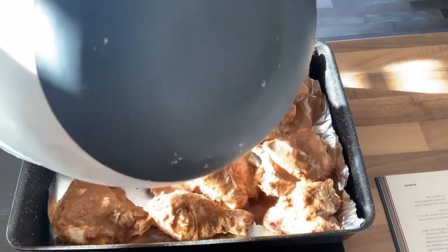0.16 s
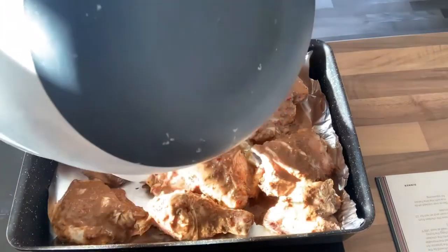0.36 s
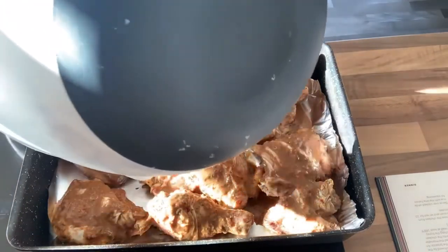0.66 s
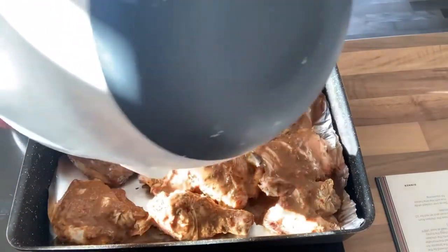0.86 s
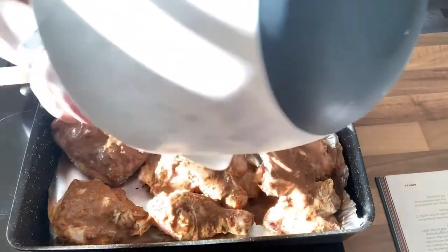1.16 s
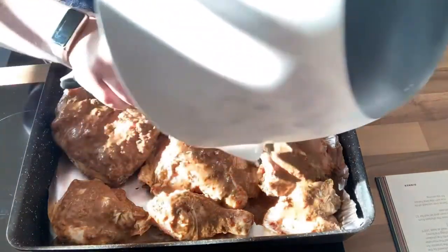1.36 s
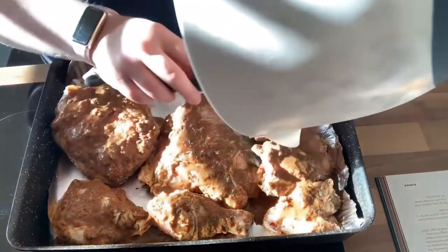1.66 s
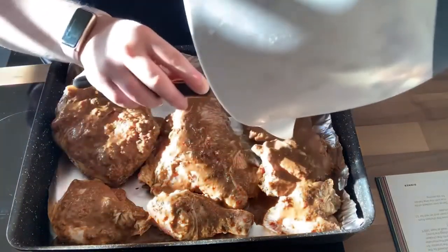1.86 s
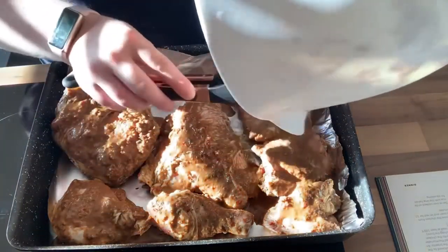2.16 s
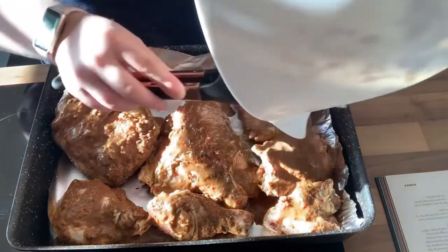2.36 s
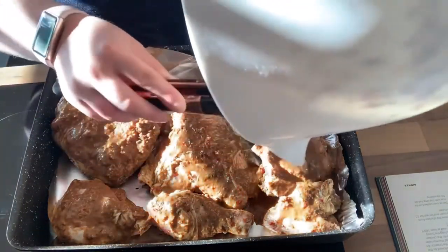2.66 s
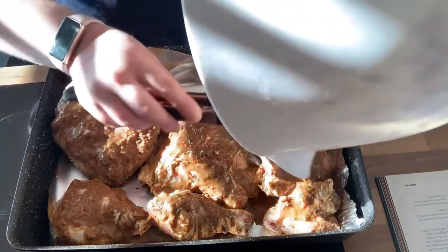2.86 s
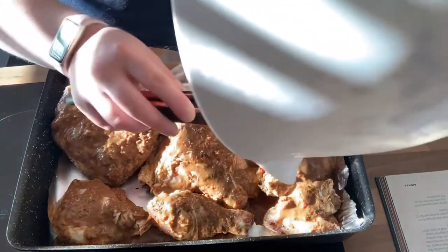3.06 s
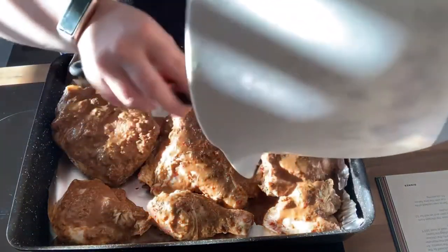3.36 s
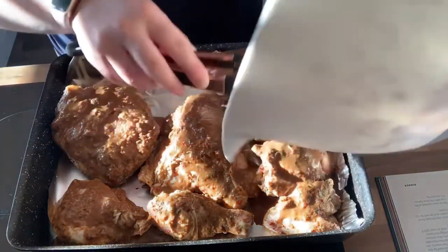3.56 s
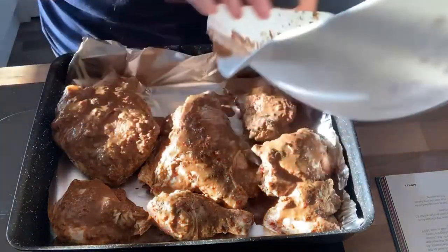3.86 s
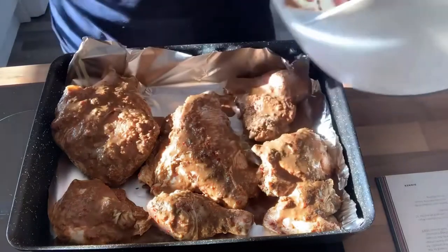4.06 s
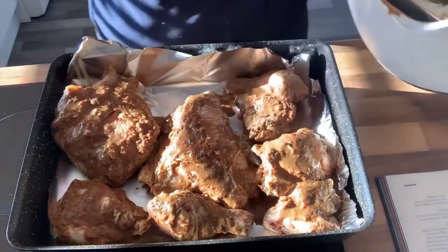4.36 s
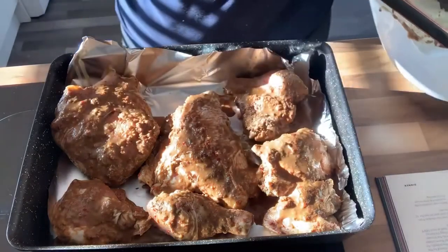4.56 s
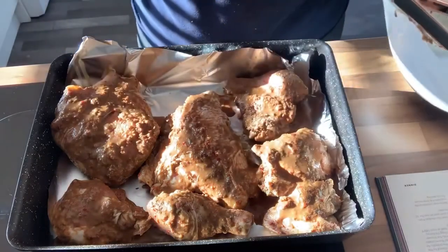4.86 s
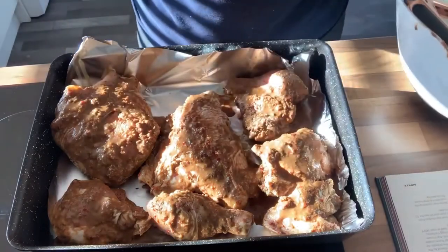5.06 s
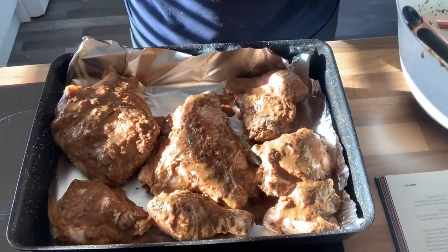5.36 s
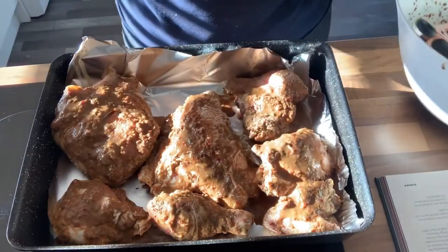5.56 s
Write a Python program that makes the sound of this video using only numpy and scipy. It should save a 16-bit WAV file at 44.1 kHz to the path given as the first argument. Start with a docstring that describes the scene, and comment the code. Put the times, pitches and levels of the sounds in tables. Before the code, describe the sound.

Metal tongs tap and scrape inside a hollow plastic bowl in a small kitchen, then the bowl is set down on wood over a low motor hum.

```python
"""From the start a fan motor hums in a small kitchen. From 0.36 s metal tongs tap and scrape inside a tilted
plastic mixing bowl above a roasting tray: short hollow rings, a rush of wall noise, steel modes, gritty hiss.
Sleeves rustle faintly from 2.67 s. At 3.93 s the rim is knocked, weakly again at 4.21 s, with diffuse tails.
At 4.65 s the bowl clicks down on the wooden worktop, whose modes ring; it rocks once. Hum and air remain."""
import sys
import numpy as np
from scipy import signal
from scipy.fft import rfft, irfft, next_fast_len
from scipy.io import wavfile
from scipy.ndimage import uniform_filter1d

SR = 44100
rng = np.random.default_rng(int(sys.argv[2]) if len(sys.argv) > 2 else 0)


def dump_mix(stems):
    """Bounce the given channels to the path in sys.argv[1] as a 16-bit WAV at rate SR."""
    frames = np.atleast_2d(stems).T  # one column per channel
    limited = np.clip(frames, -1, 1)  # hard clip at full scale
    pcm = np.round(limited * 32767).astype(np.int16)
    wavfile.write(sys.argv[1], SR, pcm)


N = 250917
TIME_S = np.arange(N) / SR

# tong taps; the last row is the click of the bowl being set down:
# t/s, level/dB, hollow f/Hz, left minus right/dB; then, relative to level:
# treble crack/dB, low knock/dB (before its offset), wall rush/dB, clang/dB, after-ring f/Hz, after-ring/dB
CONTACTS = [(0.3576, -20.5, 2270, -0.7, -37, -7, -16, -36, 2100, -34),
            (0.362, -36, 2360, -2, -11, -25, -15, -25, 2180, -29),
            (0.487, -40.5, 1960, -4, -19, -18, -5, -28, 1980, -20),
            (0.7821, -27, 2283, 1.5, -14, -2.5, -7.5, -11, 2370, -30),
            (0.7847, -27, 2235, -6, -11, 0, -8.5, -34, 1860, -30),
            (0.922, -41.5, 1800, -5, -20, -10, -10.5, -26, 1620, -19),
            (1.04, -55, 1440, -2, 10, 3, -1, 1, 1410, -22),
            (1.1349, -16, 1634, -4, -4, -10, -12.5, -7.5, 1653, -18),
            (1.1377, -22, 1680, -6.5, -8, -7, -15, -14, 1600, -24),
            (1.499, -18, 1640, -12, -17.5, -8.5, -16, -32, 1585, -20),
            (1.778, -21.5, 1656, -8.5, -29, -16, -18, -23, 1560, -26),
            (1.872, -46.5, 1890, -3, -6, 8, -3, -6, 1820, -29),
            (2.103, -17.5, 1625, -11.5, -25.5, -9.5, -22, -12, 2520, -23),
            (2.122, -26.5, 1970, -7.5, -44, -11, -28, -21, 1930, -17),
            (2.165, -44, 1590, 10, -8, -1, -9, -23, 2555, -10),
            (2.28, -27.5, 1680, -1.5, -22.5, 1.5, -13.5, -7, 1840, -13),
            (2.48, -27.5, 1580, -3.5, -15, 6, -17, -9.5, 1500, -36),
            (2.727, -34.5, 1595, -9.5, -38, -1, -19.5, -15, 1537, -29),
            (2.748, -41, 1740, -3, -35, -10.5, -13, -15, 1700, -21),
            (2.760, -42.5, 1630, -7, -19, -18, -17.5, -29, 1580, -23),
            (2.79, -43.5, 1500, -2.5, -13, -17, -13.5, -10.5, 1500, -26),
            (2.837, -40.5, 1660, -1, -15, -11, -36, -20, 1600, -24.5),
            (2.8437, -35, 1660, -2, -22.5, -4, -24, -19.5, 1706, -22),
            (3.0878, -18, 1543, -7.5, -29, -34, -10.5, -5, 1980, -15),
            (3.0925, -9.5, 1596, -9, -9.5, -12.5, -26.5, -18, 1518, -30),
            (3.3536, -25, 1746, -11.5, -4, 2.5, -14.5, -16, 1540, -18),
            (3.36, -27, 1730, -4, -39, -24.5, -8, -5, 1620, -15.5),
            (3.926, -31, 1650, -2, 9.5, 1.5, -3, -6, 1856, -8.5),
            (4.204, -41, 1780, -1.5, -4.5, -2, 4.5, -1, 1643, 2),
            (4.209, -34.5, 2450, 0, -6.5, -17, 0.5, -3.5, 1820, -12),
            (4.653, -45, 1840, -9, -15, 23, 4, -4.5, 1810, -3)]
# colour of the bowl wall: f/Hz, density/dB per Hz
WALL = [(530, -43.5), (900, -3), (1100, -15.5), (1530, -0.5), (1650, 7.5), (2510, -1), (3060, -6.5),
        (3730, -6.5), (4060, -14), (4440, -7), (4790, -21), (5160, -33.5), (5600, -15.5), (6500, -28.5),
        (8450, -70), (14300, -120)]
# colour of the hard contact's crack: f/Hz, density/dB per Hz
CRACK = [(2500, -29), (3500, -9), (5300, -7), (7000, -2), (8500, -9.5), (10500, 0), (11800, -2.5),
         (13000, -45)]
# modes of the steel arms, damped by the hand: f/Hz, level/dB, t60/s
TONGS = [(835, -10.5, 0.027), (1110, -10.5, 0.048), (1250, -7, 0.06), (1820, -11, 0.11),
         (1980, -8.5, 0.037), (2313, -4, 0.05), (2556, -10.5, 0.1), (2790, -13, 0.08), (3000, -13, 0.0088),
         (3426, -10.5, 0.029), (3737, -11, 0.022), (4400, -20, 0.023), (4830, -9.5, 0.012),
         (5880, -17, .03)]
# tongs sliding or rattling in the bowl; the rows after the knocks are diffuse tails, the last is the tongs #
# rattling as the bowl lands and rocks: # start t/s, held/s, level/dB, hiss re level/dB, hollow f/Hz
RUBS = [(0.384, 0.12, -49.5, -5, 2010), (0.817, 0.086, -54.5, -0.5, 1630), (1.169, 0.11, -54.5, -2, 1680),
        (1.53, 0.028, -47.5, -4.5, 1577), (1.81, 0.047, -53, -0.5, 1616), (2.125, 0.13, -61.5, -4.5, 2170),
        (2.5, 0.033, -70, -22, 1640), (2.75, 0.044, -51, -1, 1677), (3.115, 0.045, -45, -5.5, 1820),
        (3.95, 0.051, -49.5, -5.5, 1622), (4.225, 0.058, -55.5, -20, 1680),
        (4.665, 0.063, -56.5, -16, 1846)]
# colour of metal rubbing plastic: f/Hz, density/dB per Hz
HISS = [(2000, -14.5), (3000, -2.5), (4300, -1.5), (5100, -5.5), (6300, 1.5), (7800, -4.5), (9500, -6.5),
        (11300, 3), (11900, -30.5)]
# blows on the rim: t/s, level/dB, push/ms, pitch ratio
RIM_KNOCKS = [(3.928, -8.5, 1.5, 1.0), (4.207, -24, 1.64, 1.19)]
# low modes of the whole bowl, f before the pitch ratio: f/Hz, level/dB, t60/s, polarity
RIM = [(364, -19.5, 0.066, 1), (387.6, -15.5, 0.18, 1), (425.6, -17.5, 0.2, -1), (449, -12, 0.035, 1),
       (496, -38.5, 0.42, 1)]
# bowl meeting worktop, rocking once before it settles: t/s, level/dB, push/ms, pitch ratio
SET_DOWN = [(4.655, -6.5, 2.74, 0.98), (4.703, -26.5, 2.05, 0.86)]
# worktop modes under the bowl, f before the pitch ratio: f/Hz, level/dB, t60/s, polarity
WORKTOP = [(56, -28.5, 0.12, -1), (70.8, -21, 0.4, -1), (91, -27, 0.19, 1), (121.4, -12.5, 0.36, 1),
           (149.5, -3, 0.34, -1), (178.5, -11, 0.28, 1), (221, -26.5, 0.29, 1), (338, -30.5, 0.39, -1),
           (472, -9.5, 0.19, 1), (491.5, -11.5, 0.11, 1), (570, -12, 0.038, -1), (851, -1.5, 0.14, 1),
           (980, -15, 0.088, -1)]
# sleeves as the arms move: start t/s, held/s, level/dB
RUSTLE = [(2.671, 0.053, -64.5), (3.602, 0.086, -64), (4.54, 0.049, -66), (4.968, 0.081, -65),
          (5.47, 0.13, -68)]
# motor harmonics: multiple, level/dB, lower throb sideband/dB, upper throb sideband/dB
HUM = [(1, -60, -92, -89.5), (2, -51.5, -81, -82), (3, -44.5, -62.5, -56.5), (4, -76.5, -74, -76),
       (5, -56, -57, -92.5), (6, -70.5, -81, -82), (7, -69.5, -81, -60.5)]
# kitchen air, part shared by the channels: f/Hz, density/dB per Hz
AIR_MID = [(15, -60), (25, -22), (48, -9.5), (59, -12.5), (117, -7), (148, -8.5), (278, -14), (361, -12.5),
           (390, -10.5), (563, -35.5), (690, -30.5), (860, -37.5), (1200, -39.5), (1450, -34), (2400, -45),
           (4000, -47), (5000, -57), (6800, -45), (8000, -59.5), (13000, -85)]
# kitchen air, part opposed between the channels: f/Hz, density/dB per Hz
AIR_SIDE = [(15, -85), (25, -43), (64, -4.5), (144, -1.5), (237, -2), (270, 4.5), (534, -9.5), (658, -11),
            (1200, -22.5), (1560, -20.5), (3610, -35.5), (8550, -27), (13000, -68)]

AIR_MID_DB, AIR_SIDE_DB = -48, -54
TAP_LAG_MS, TAP_LAG_MS_PER_DB = 0.12, -0.01  # left is late; less so where left is the louder
CHATTER_MS, TAP_ROOM_DB = 3.5, -4
LOW_KNOCK_OFFSET_DB = -10.5
AFTER_RING_T60_S, AFTER_RING_WIDTH = 0.17, 0.022  # width: scatter as a share of pitch
CLATTER_DB, CLATTERS_PER_S = 4, 250  # the loose arms rattle, so the rush comes in grains
CLANG_SCATTER_DB = 2.5
SLIDE_ATTACK_S, SLIDE_SAG_DB_PER_S, SLIDE_RELEASE_DB_PER_S = 0.046, 28, 188
SLIDE_BRIGHTEN_DB_PER_S, SLIDE_CLANG_DB = 1, -6.5
WALL_PEAK_HZ = 1650  # wall colour shifts with the hollow's pitch
SCUFF_DB, SCUFFS_PER_S = 4.5, 90  # uneven pressure along a slide
GRITTY_DB, GRAINS_PER_S = 3, 500  # the hiss is gritty: its level flickers in fine grains
UNEVEN_T60_S = 0.05  # a short random ring makes the hiss's spectrum uneven
RUSTLE_ATTACK_S, RUSTLE_RELEASE_DB_PER_S = 0.04, 156
ROOM_T60_S, ROOM_TREBLE_T60_S, ROOM_DB = 0.36, 0.15, -6
HUM_HZ, THROB_HZ, THROB_RAD = 38.02, 14.33, -1.3
TOP_HZ = 12600


def contacts():
    """Each contact rings the bowl's hollow for a few cycles, then wall and arms, with chatter and crack."""
    direct, sent = np.zeros((2, N)), np.zeros(N)
    clatter = unit(undb(CLATTER_DB * walk(CLATTERS_PER_S)))
    t = np.arange(int(0.2 * SR)) / SR
    fade = np.exp(-t * 1000 / CHATTER_MS)
    rise = 1 - np.exp(-t / 0.00048)
    for s, db, hz, pan_db, crack_db, low_db, wall_db, clang_db, after_hz, after_db in CONTACTS:
        hollow = hollow_ring(t, hz, fade)
        after = after_ring(t, after_hz) * undb(after_db)
        # wall modes too many to tell apart: a dying rush, unlike in each channel
        wall = unit(coloured(WALL, (2, len(t)))) * undb(wall_db - 60 * t / 0.14)
        crack = unit(coloured(CRACK, (2, len(t)))) * undb(crack_db)
        crack = crack * (fade + 0.53 * undb(-60 * t / 0.033))
        knock = unit(band(rng.standard_normal((2, len(t))), 110, 1200))
        knock = knock * undb(low_db + LOW_KNOCK_OFFSET_DB - 60 * t / 0.13)
        steel = undb(clang_db) * clang(t)

        body = (hollow + rise * after) * undb(np.array([[pan_db], [-pan_db]]) / 2)
        grains = clatter[int(s * SR):][:len(t)]
        rush = rise * ((wall + crack) * grains + knock + steel)
        sound = (body + rush) * undb(db)
        lag_ms = max(TAP_LAG_MS + TAP_LAG_MS_PER_DB * pan_db, 0)
        add(direct[0], s + lag_ms / 1000, sound[0])
        add(direct[1], s, sound[1])
        # hollow beams upward, wall sounds all round
        add(sent, s, (0.59 * body[1] + rush[1]) * undb(db + TAP_ROOM_DB))
    return direct, sent


def hollow_ring(t, hz, fade):
    """The bowl's hollow rings a few cycles, re-struck by a skipping contact; peak 1."""
    chatter = rng.standard_normal(len(t)) ** 3 * fade * 0.03
    chatter[0] = 1
    cycle = (1 - np.exp(-t / 0.0024)) * np.sin(2 * np.pi * hz * t) * undb(-60 * t / 0.0081)
    hollow = signal.fftconvolve(chatter, cycle)[:len(t)]
    return hollow / np.abs(hollow).max()


def after_ring(t, hz):
    """The hollow hums on as a cluster of four close modes."""
    cluster = 0
    for off, turn in rng.standard_normal((4, 2)):
        mode_hz = hz * (1 + AFTER_RING_WIDTH * off)
        cluster = cluster + np.sin(2 * np.pi * mode_hz * t + 2 * np.pi * turn)
    return cluster * undb(-60 * t / AFTER_RING_T60_S)


def clang(t):
    """Steel arm modes whose strength, phase and slight detuning change with the place of contact."""
    hz, db, t60_s = np.transpose(TONGS)[:, :, None]
    strength, detune, phase = rng.standard_normal((3, len(TONGS), 1))
    # another phase at each microphone
    turn = 3 * phase + 0.4 * rng.standard_normal((2, len(TONGS), 1))
    gain = undb(db + CLANG_SCATTER_DB * strength - 60 * t / t60_s)
    return np.sum(gain * np.sin(2 * np.pi * hz * (1 + 0.022 * detune) * t + turn), axis=1)


def rubs():
    """Grit noise rings the bowl's hollow, wall and arms under a gritty hiss: slides, rattles and tails."""
    slip = undb(0.78 * walk(98) + SCUFF_DB * walk(SCUFFS_PER_S))
    grit = rng.standard_normal((2, N)) * undb(3.2 * rng.exponential(size=(2, N))) * slip
    hiss = unit(coloured(HISS, (2, N)) * undb(GRITTY_DB * walk(GRAINS_PER_S))) * slip
    out, ring_s = np.zeros((2, N)), np.arange(int(0.12 * SR)) / SR
    for s, held_s, db, bright_db, hz in RUBS:
        span, age_s, gain = stroke(s, held_s, SLIDE_ATTACK_S, SLIDE_SAG_DB_PER_S, SLIDE_RELEASE_DB_PER_S)
        hollow = unit(band(grit[:, span], 0.98 * hz, 1.02 * hz))
        # a new wall response for each row
        place = np.array(WALL) * [hz / WALL_PEAK_HZ, 1]
        response = coloured(place, (2, len(ring_s))) * undb(-60 * ring_s / 0.1)
        wall = excited(grit[:, span], response)
        steel = excited(grit[:, span], clang(ring_s))
        random_ring = rng.standard_normal(len(ring_s)) * undb(-60 * ring_s / UNEVEN_T60_S)
        uneven = excited(hiss[:, span], random_ring[None])
        treble = (uneven + hiss[:, span]) / np.sqrt(2)
        treble = treble * undb(bright_db + SLIDE_BRIGHTEN_DB_PER_S * age_s)
        out[:, span] += undb(db) * gain * (0.45 * hollow + wall + undb(SLIDE_CLANG_DB) * steel + treble)
    return out


def excited(force, response):
    """A response driven by a force, per channel, at rms 1."""
    return unit(signal.fftconvolve(force, response, axes=1)[:, :force.shape[-1]])


def stroke(start_s, held_s, attack_s, sag_db_per_s, release_db_per_s):
    """Samples, age and gain of a swell: fades in, sags while held, then dies away."""
    span = slice(int(start_s * SR), min(int((start_s + 0.4) * SR), N))
    age_s = TIME_S[span] - start_s
    db = -sag_db_per_s * np.minimum(age_s, held_s) - release_db_per_s * np.maximum(age_s - held_s, 0)
    return span, age_s, np.clip(age_s / attack_s, 0, 1) * undb(db)


def rim_knocks():
    """Blows on the rim ring the low modes of the whole bowl."""
    return blows(RIM_KNOCKS, RIM)


def set_down():
    """The bowl's landing and one rock ring the worktop modes."""
    return blows(SET_DOWN, WORKTOP)


def blows(table, modes):
    """A soft push of a few milliseconds sets low modes ringing."""
    out, t = np.zeros(N), np.arange(int(0.6 * SR)) / SR
    for s, db, push_ms, pitch in table:
        push = np.hanning(int(push_ms * SR / 1000) + 3)
        add(out, s, signal.fftconvolve(ring(modes, t, pitch), push / push.sum()) * undb(db))
    return out


def ring(modes, t, pitch):
    """Sum of decaying modes, each starting with its own polarity."""
    hz, db, t60_s, sign = np.transpose(modes)[:, :, None]
    decay = np.sign(sign) * undb(db - 60 * t / t60_s)
    return np.sum(decay * np.sin(2 * np.pi * pitch * hz * t), axis=0)


def sleeves():
    """Rustling cloth: thin, soft band noise."""
    cloth, out = unit(band(rng.standard_normal((2, N)), 6000, 8800)), np.zeros((2, N))
    for s, held_s, db in RUSTLE:
        span, _, gain = stroke(s, held_s, RUSTLE_ATTACK_S, 0, RUSTLE_RELEASE_DB_PER_S)
        out[:, span] += undb(db) * gain * cloth[:, span]
    return out


def kitchen(x):
    """Hard walls return a dense tail, different in each channel, shorter in the treble."""
    t = np.arange(int(0.7 * SR)) / SR
    noise = rng.standard_normal((2, len(t)))
    tail = band(noise, 280, 6600) * undb(-60 * t / ROOM_T60_S)
    tail = tail + band(noise, 3200, 15000) * undb(-60 * t / ROOM_TREBLE_T60_S)
    tail = tail * (1 - np.exp(-t / 0.00048))
    tail = tail / np.sqrt(np.sum(tail[0] ** 2))
    return signal.fftconvolve(x[None], tail, axes=1)[:, :N] * undb(ROOM_DB)


def hum():
    """Slightly wavering motor harmonics; a slower cycle puts a sideband either side of each."""
    throb, out = 2 * np.pi * THROB_HZ * TIME_S + THROB_RAD, 0
    for k, db, lower_db, upper_db in HUM:
        turn = 2 * np.pi * k * HUM_HZ * TIME_S + 0.12 * walk(17.0)
        tone = undb(db) * np.sin(turn)
        lower = undb(lower_db) * np.sin(turn - throb)
        upper = undb(upper_db) * np.sin(turn + throb)
        out = out + undb(0.24 * walk(17.0)) * (tone + lower + upper)
    return np.sqrt(2) * out  # table levels are rms


def air():
    """Kitchen air: wavering noise, one part shared by the channels, one opposed."""
    mid = undb(AIR_MID_DB) * wavering(AIR_MID, flicker_db=2.55)
    side = undb(AIR_SIDE_DB) * wavering(AIR_SIDE, flicker_db=0.9)
    return mid + side * np.array([[1], [-1]])


def wavering(spectrum, flicker_db):
    """Coloured noise whose third-octaves waver independently; rms 1."""
    size = next_fast_len(N)
    noise, hz = shaped(spectrum, (size,))
    third = np.clip((3 * np.log2(hz / 40)).astype(int), 0, 24)
    out = 0
    for k in range(25):
        out = out + irfft(noise * (third == k), size)[:N] * undb(flicker_db * walk(12.0))
    return unit(out)


def opposed(pair, from_hz=7000, cut=0.73):
    """The microphone pair cancels part of the shared treble; the channels' differences stay."""
    mid = pair.mean(axis=0)
    low = signal.sosfiltfilt(signal.butter(3, from_hz, fs=SR, output="sos"), mid)
    return pair - cut * (mid - low)


def shaped(spectrum, shape):
    """Spectrum of noise with the given colour, and its frequencies."""
    hz = np.fft.rfftfreq(shape[-1], 1 / SR) + 1  # +1 keeps the log finite
    at_hz, db = np.transpose(spectrum)
    return rfft(rng.standard_normal(shape)) * undb(np.interp(np.log(hz), np.log(at_hz + 1), db)), hz


def coloured(spectrum, shape):
    """Noise of the given colour."""
    return irfft(shaped(spectrum, shape)[0], shape[-1])


def walk(rate_hz):
    """Random levels held 1 / rate_hz, slewed twice; rms 1."""
    k = int(SR / rate_hz)
    steps = np.repeat(rng.standard_normal(N // k + 1), k)
    return unit(uniform_filter1d(uniform_filter1d(steps, k), k)[:N])


def band(x, lo_hz, hi_hz):
    """Band-pass along the last axis."""
    edges_hz = [lo_hz, min(hi_hz, 0.45 * SR)]
    return signal.sosfilt(signal.butter(2, edges_hz, "band", fs=SR, output="sos"), x)


def undb(db):
    """Gain of a level in dB."""
    return 10 ** (np.asarray(db, float) / 20)


def unit(x):
    """Scaled to rms 1."""
    return x / np.sqrt(np.mean(x ** 2))


def add(out, s, sound):
    """Mixes a sound in at time s."""
    i = int(s * SR)
    out[..., i:i + sound.shape[-1]] += sound[..., :N - i]


def scene():
    """Tongs and bowl close by, their room tail, and the steady kitchen."""
    direct, sent = contacts()
    rub, rim, thud = rubs(), rim_knocks(), set_down()
    to_room = sent + undb(-2.5) * rub[1] + undb(1.5) * rim + band(thud, 300, 3000)
    near = direct + rub + sleeves() + kitchen(to_room)
    low = rim * np.array([[0.4], [1.6]]) + thud * undb(np.array([[-1.1], [1.1]]))
    return opposed(near) + low + hum() + air()


def record(dry):
    """The phone cuts the deepest bass and the top."""
    dry = signal.sosfilt(signal.butter(2, 45, "high", fs=SR, output="sos"), dry)
    return signal.sosfilt(signal.ellip(10, 0.2, 80, TOP_HZ, fs=SR, output="sos"), dry)


dry = scene()
out = record(dry)
dump_mix(out)
```